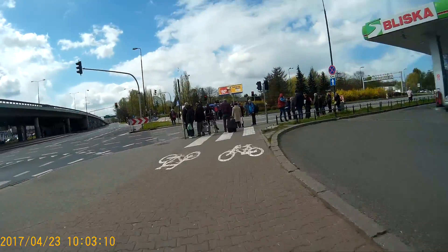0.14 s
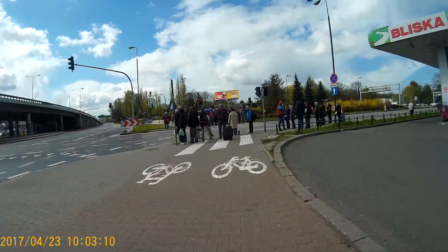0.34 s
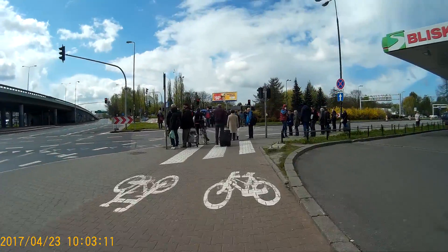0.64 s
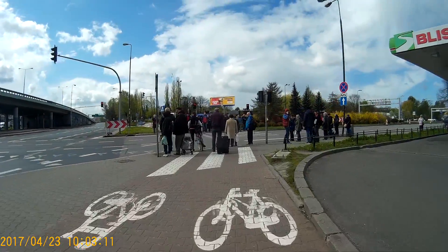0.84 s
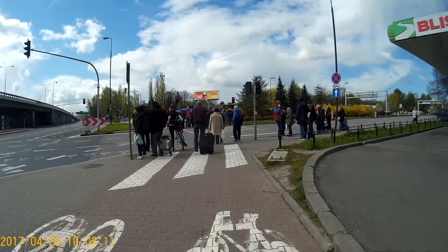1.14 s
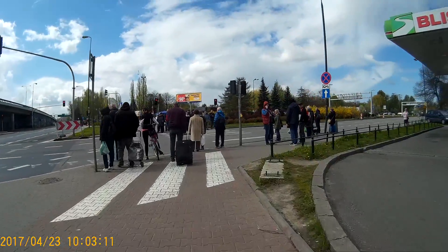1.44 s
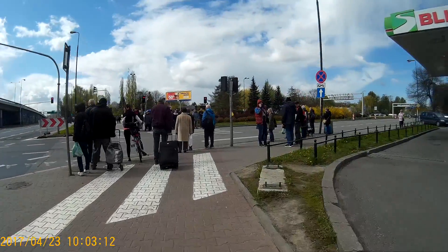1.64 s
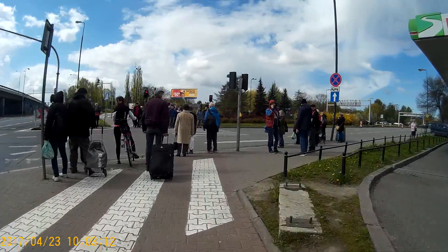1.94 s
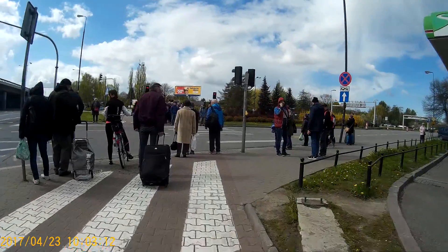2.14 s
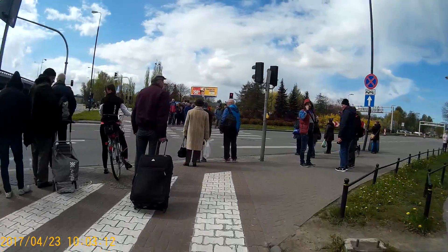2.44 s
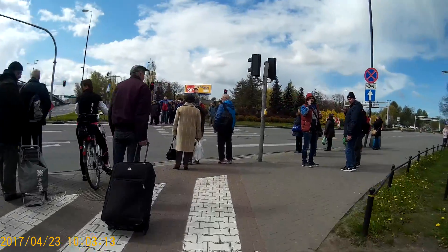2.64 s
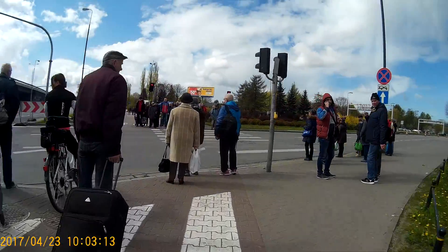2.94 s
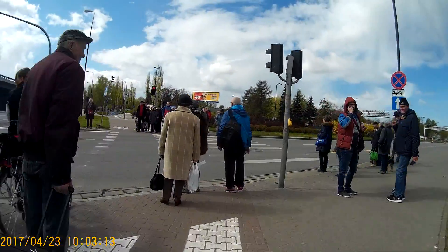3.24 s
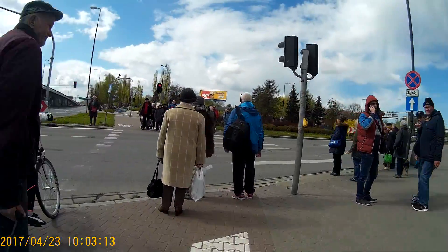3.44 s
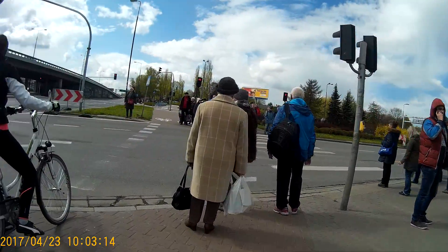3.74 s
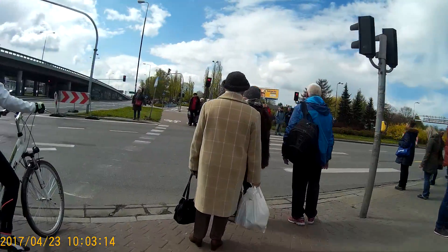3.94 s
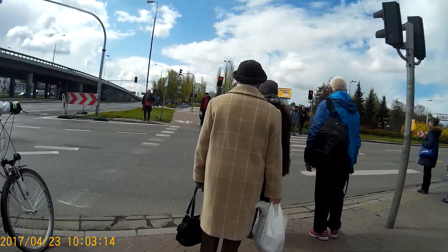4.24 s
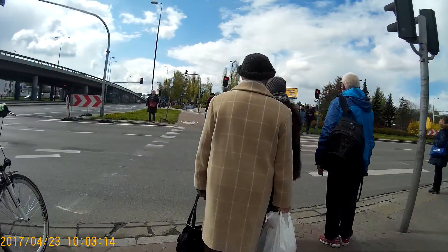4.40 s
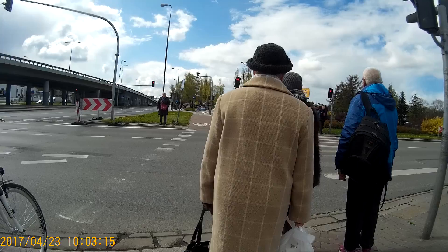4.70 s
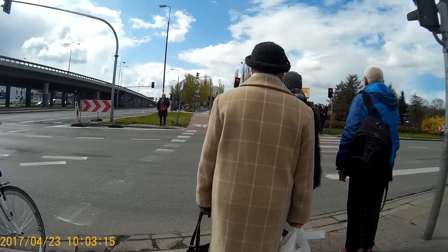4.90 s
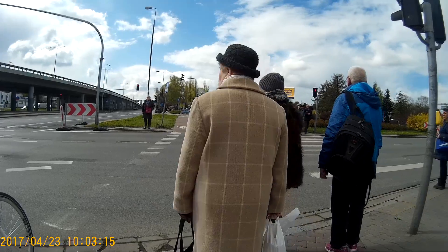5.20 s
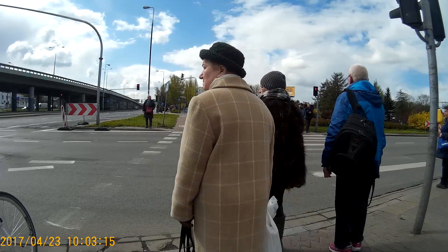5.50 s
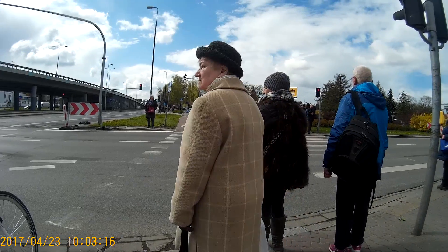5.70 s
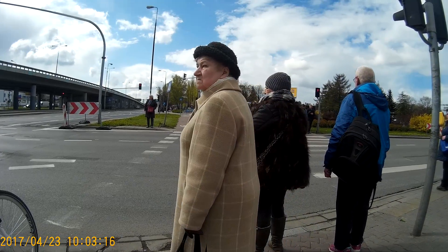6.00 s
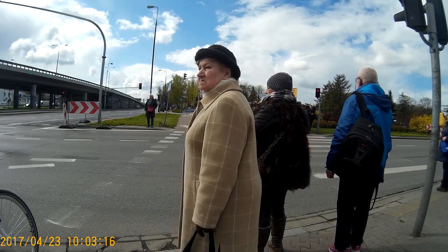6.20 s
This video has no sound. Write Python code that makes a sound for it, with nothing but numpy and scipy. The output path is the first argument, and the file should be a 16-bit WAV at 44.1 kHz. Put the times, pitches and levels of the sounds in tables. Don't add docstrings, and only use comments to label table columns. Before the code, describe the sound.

Close on a bicycle handlebar, the wheels rumble over paving blocks while a loose plastic housing clacks hard and thuds on its pad. Grit ticks and air buffets the microphone. The rattling thins as the bike slows, then a low shudder and a sharp bar knock mark the stop. A few dull taps follow, then only distant traffic wash and faint hiss at an open street crossing.

```python
import sys
import numpy as np
from scipy import signal
from scipy.fft import rfft, irfft
from scipy.io import wavfile
from scipy.ndimage import uniform_filter1d

SR = 44100
rng = np.random.default_rng(int(sys.argv[2]) if len(sys.argv) > 2 else 0)


def field_ratio(decibels):
    return 10 ** (np.asarray(decibels, dtype=float) / 20)


def transcribe(u):
    v = np.clip(np.atleast_2d(u).T, -1, 1)
    q = np.round(v * 32767).astype(np.int16)
    wavfile.write(sys.argv[1], SR, q)


N = 280211

# (start [s], end [s], extra level [dB])
BUSY_TIMES = [
    (-.1, 2.45, 5),
    (2.4, 3.6, 3),
    (3.2, 4.2, 0),
    (4.7, 4.96, 6.5),
]
# (frequency [Hz], width [Hz], level [dB])
CIRCUIT_WHINE = (7940, 6, -85)
# (frequency [Hz], level per Hz [dB])
TRAFFIC_COLOUR = [(12, -47), (20, 8.5), (168, -2), (403, -6.5), (485, -6.5), (718, -12), (1020, -12.5),
                  (1110, -16), (1610, -14), (5000, -30.5), (6500, -55), (11000, -120)]
# (time [s], level [dB])
ROAD_SHAKE = [(0, -25.5), (.6, -28), (1.2, -30), (1.6, -31), (2.2, -33), (2.55, -36), (2.9, -31),
              (3.3, -38.5), (3.7, -39.5), (4.0, -45.5), (4.3, -42.5), (4.6, -52), (4.67, -31), (4.78, -37),
              (4.92, -46), (5.25, -61), (5.8, -80.5)]
# (time [s], level [dB], length [s])
FORK_JOLTS = [(0.202, -14.5, 0.055), (0.4, -20.5, 0.04), (0.597, -22.5, 0.04), (0.684, -17, 0.064),
              (0.94, -19, 0.085), (1.002, -18, 0.02), (1.08, -16, 0.033), (1.487, -21, 0.1),
              (1.576, -19.9, 0.016), (1.646, -16.4, 0.021), (1.785, -24.5, 0.078), (2.001, -21, 0.03),
              (2.096, -23, 0.038), (2.3, -25.5, 0.12), (2.369, -32, 0.028), (2.44, -37, 0.048),
              (2.658, -23, 0.065), (2.74, -20, 0.019), (2.904, -23, 0.13), (3.137, -27, 0.14),
              (3.447, -26, 0.032), (3.519, -19.5, 0.048), (3.904, -32.5, 0.22), (4.246, -33.5, 0.17),
              (4.552, -39, 0.054), (4.988, -37, 0.041), (5.099, -39.5, 0.058), (5.363, -51, 0.06),
              (5.515, -44.5, 0.074), (5.683, -52, 0.065)]
# (frequency [Hz], width [Hz], level [dB])
FORK_PEAKS = [(64.15, 19, 6.5), (93.9, 31, -5.5)]
# (frequency [Hz], width [Hz], level [dB])
FRAME_PEAKS = [(185.7, 42, -1.5), (258, 94, -10.5), (150.1, 54, -1), (336.4, 40, -18.5), (120, 21, -5.5)]
# (frequency [Hz], width [Hz], level [dB])
HOUSING_PEAKS = [(799.4, 23, 12), (405, 230, 3.5), (917, 300, 2.5), (1460, 310, -12), (1696, 440, -1),
                 (1260, 360, -9.5), (678, 37, -5), (2530, 3800, -20.5)]
# (time [s], bar ring level [dB], low thump level [dB], tuning [factor], damping [factor])
FRAME_KNOCKS = [
    (4.738, -17.5, -23, .99, 0.65),
    (4.741, -60, -20, 0.51, 1.1),
    (4.952, -33.5, -52, 1.02, 1),
    (4.957, -33.5, -24, 1.16, 0.6),
    (5.091, -46, -41.5, 1.14, 2.7),
    (5.479, -57, -39, .6, 2.4),
    (5.51, -50, -34, .42, 1.5),
    (4.183, -40, -33, 0.69, 1.6),
]
# (frequency [Hz], level [dB], time to fall 60 dB [s])
BAR_TONES = [(800, -7, .07), (888, -3, .06), (1150, -6, .025), (1380, -3, .025), (1740, -5, .03),
             (1900, -9, .04), (2740, -20, .02), (1500, -3, .005), (470, -10, .02)]
# (frequency [Hz], level [dB], time to fall 60 dB [s])
THUMP_TONES = [(184, 15.5, 0.083), (266, 13, 0.066), (332, 2.5, 0.033), (430, -16, 0.039)]
# (time [s], frequency [Hz], level [dB], time to fall 60 dB [s])
THIN_PING = (4.951, 3780, -57, .03)
# (frequency [Hz], level [dB], time to fall 60 dB [s])
CLACK_TONES = [(-670, -21, .04), (-795, -15, .085), (-1170, -20, .022), (-1410, -11, .019),
               (-1480, -3, .011), (1940, -7.5, .003), (2250, -5, .012), (-2680, -9, .0045)]
# (frequency [Hz], level [dB], time to fall 60 dB [s])
RIM_TONES = [(-3280, 2.5, 0.004), (3603, -12, 0.025), (4652.5, -2.5, 0.011), (4912.5, 10, 0.0049),
             (5709.5, -12.5, 0.018), (-6020, -18, 0.004), (-6960, -17.5, 0.00067), (-8700, -4.5, .005),
             (9504, -16, 0.0081), (11797, -30.5, 0.0024), (-14500, -40, .002)]
# (frequency [Hz], level [dB], time to fall 60 dB [s])
BUMP_TONES = [(803, -9.5, 0.051), (-1250, 9.5, 0.0025), (1749.5, -2, 0.012), (3304.5, -37.5, .004),
              (501, 3, 0.0052), (-2700, -17, 0.0038)]
# (time [s], blow level [dB])
SQUARE_HITS = [(.0013, -3.5), (.0306, -1.5), (.1079, -1), (.1444, -1.5), (0.2865, -5.5), (.3014, -10.5),
               (0.3172, -8), (0.4783, -4.5), (.5685, -8), (.599, -4.5), (0.6368, -3), (.6852, -3.3),
               (0.6964, -2.5), (.8499, -7.5), (.907, -2), (.9543, -0.8), (1.0931, -11.5), (1.4597, -8),
               (1.4907, -5), (1.5369, -8), (1.58, -10), (1.7802, -5), (1.8634, -8.5), (2.743, -7.5),
               (2.839, -5.5), (2.9262, -4.5), (3.054, -4), (3.1603, -6), (3.591, -10.5)]
# (time [s], blow level [dB])
LIGHT_HITS = [(.0342, -10.5), (.359, -28), (.388, -30), (.7368, -14), (.7818, -15), (.9665, -12.5),
              (1.011, -20), (1.1467, -15.5), (1.287, -20.5), (1.3161, -12), (1.4005, -22.5), (1.5182, -25),
              (1.6649, -12.5), (1.9678, -24.5), (2.0313, -15), (2.1, -13.5), (2.1845, -15.5), (2.2588, -23),
              (2.3312, -17.5), (2.5466, -15), (2.636, -25), (2.6997, -22), (2.95, -14), (3.0355, -30),
              (3.0812, -31), (3.2337, -16), (3.5118, -33), (4.6642, -19.5), (4.6761, -29.5),
              (4.7352, -26.5)]
# (time [s], blow level [dB])
SLANTING_HITS = [(.2072, -13), (.401, -19), (.4202, -23.5), (0.434, -16), (0.4607, -17.5), (0.5442, -22.5),
                 (.9238, -11.5), (.9427, -12), (1.6446, -17), (1.6523, -12), (1.7271, -26), (1.7595, -27.5),
                 (1.9219, -14.5), (1.935, -15.5), (2.005, -17.5), (2.134, -16.5), (2.309, -34),
                 (2.3648, -34.5), (2.9818, -22.5), (3.0216, -28), (3.114, -31.5), (3.2656, -34.5),
                 (3.4538, -40.5), (3.526, -37.5), (3.547, -35), (4.6473, -35), (4.6934, -26.5),
                 (4.722, -27), (4.79, -41), (4.821, -39.5)]
# (time [s], blow level [dB])
PAD_LANDINGS = [(.024, -19.5), (.0763, -11.5), (.0866, -20.5), (.138, -20.5), (.1519, -24.5), (.183, -28.5),
                (.1978, -14), (.2129, -10), (.2228, -15.5), (.2353, -20.5), (.2548, -22.5), (.2615, -23.5),
                (.4123, -13.5), (.6247, -14), (.6668, -12.5), (.675, -17.5), (.7122, -15.5), (.8116, -21),
                (.9314, -15), (1.0737, -17.5), (1.084, -22.5), (1.4355, -30), (1.504, -22), (1.5733, -19),
                (2.6786, -27.5), (2.7339, -17.5), (2.9174, -19), (3.1414, -17), (3.5806, -24.5),
                (4.6274, -45)]
SOFTNESS = (.05, .09, .42, .83)

TOP_HZ = 15740
SHUDDER_START_S, SHUDDER_END_S = 4.625, 4.94


def evened(x):
    return x / np.sqrt(np.mean(x ** 2) + 1e-20)


def road_shake_db():
    s, db = np.transpose(ROAD_SHAKE)
    return np.interp(np.arange(N) / SR, s, db)


def add(mix, s, sound):
    part = mix[max(round(s * SR), 0):][:len(sound)]
    part += sound[:len(part)]


def span(start, end, edge_s):
    t = np.arange(N) / SR
    return np.clip((t - start) / edge_s, 0, 1) * np.clip((end - t) / edge_s, 0, 1)


def lumps(depth_db):
    slow = uniform_filter1d(uniform_filter1d(rng.standard_normal(N), size=1800), size=1800)
    return field_ratio(depth_db * evened(slow))


def coloured_noise(gain_at_hz):
    return evened(irfft(rfft(rng.standard_normal(N)) * gain_at_hz, N))


def shaken(drive, peaks):
    out, t = 0, np.arange(len(drive)) / SR
    for k, (hz, width, db) in enumerate(peaks):
        turn = np.exp(2j * np.pi * hz * t)
        r = np.exp(-np.pi * width / SR)
        slow = drive / turn
        for _ in range(2):
            slow = signal.lfilter([1 - r], [1, -r], slow)
        out = out + (-1) ** k * field_ratio(db) * (turn * slow).real
    return evened(out)


def ring(tones, tuning=1., damping=1., size=6000, lean_db=0.):
    t = np.arange(size) / SR
    hz, db, t60 = np.transpose(tones)[:, :, None]
    tuning, lean_db = np.reshape(tuning, (-1, 1)), np.reshape(lean_db, (-1, 1))
    fade = field_ratio(db + lean_db - 60 * t * damping / t60)
    out = (fade * np.sin(2 * np.pi * hz * tuning * t)).sum(0)
    return out / abs(out).max()


def hiss():
    hz = np.fft.rfftfreq(N, 1 / SR)
    colour = (hz < TOP_HZ) / np.sqrt(1 + (hz / 15200) ** 30)
    extra_db = sum(db * span(a, b, 0.056) for a, b, db in BUSY_TIMES)
    return field_ratio(-69.5 + extra_db) * coloured_noise(colour)


def whine():
    hz, width, db = CIRCUIT_WHINE
    fade = np.clip(3.8 - np.arange(N) / SR, 0, 1)
    return field_ratio(db) * shaken(rng.standard_normal(N), [(hz, width, db)]) * fade


def street():
    hz = np.fft.rfftfreq(N, 1 / SR)
    f, db = np.transpose(TRAFFIC_COLOUR)
    colour = field_ratio(np.interp(np.log(hz + 1), np.log(f + 1), db)) * (hz < TOP_HZ)
    return field_ratio(-59) * coloured_noise(colour)


def road():
    sway_db, buffet_db, braked_db, jolt_hum_db = 5.5, -1, -23, -18
    steadiness = 0.46
    roll = field_ratio(road_shake_db())
    free = field_ratio(braked_db * span(SHUDDER_START_S - .02, SHUDDER_END_S, 0.036))
    t = np.arange(0, N, 50) / SR
    jolt = sum(field_ratio(db) ** 2 * np.exp(-((t - s) / (0.39 * length)) ** 2) for s, db, length in FORK_JOLTS)
    jolt = np.interp(np.arange(N) / SR, t, jolt)
    fork_drive, frame_drive, air = rng.standard_normal((3, N))

    fork = shaken(fork_drive, FORK_PEAKS)
    fork = evened(fork / (uniform_filter1d(fork ** 2, size=1300) + .05) ** (steadiness / 2))
    sway = np.sqrt((roll * free * field_ratio(sway_db)) ** 2 + jolt)
    hum = np.sqrt(roll ** 2 + jolt * field_ratio(jolt_hum_db) ** 2)
    frame = lumps(2.5) * shaken(frame_drive, FRAME_PEAKS)
    low_band = signal.butter(2, [14, 40], "band", fs=SR, output="sos")
    buffet = evened(signal.sosfilt(low_band, air))
    return sway * fork + hum * frame + roll * free * field_ratio(buffet_db) * buffet


def grit():
    size = field_ratio(2.5 * np.minimum(rng.exponential(1, N), 4)) * rng.choice([-1, 1], N)
    ticks = size * (rng.random(N) < 4000 / SR)
    fade = np.clip((5.4 - np.arange(N) / SR) / 0.15, 0, 1)
    level = field_ratio(-24.5 + 0.78 * road_shake_db())
    return level * fade * lumps(3.0) * shaken(ticks, HOUSING_PEAKS)


def fork_shudder():
    start_db, hold_s, hold_db_per_s, decay_db_per_s = -18.5, 0.1, 35, 60
    age = np.maximum(np.arange(N) / SR - SHUDDER_START_S, 0)
    db = start_db - hold_db_per_s * np.minimum(age, hold_s) - decay_db_per_s * np.maximum(age - hold_s, 0)
    note = np.sin(2 * np.pi * 68.9 * (age - .002))
    return np.sqrt(2) * field_ratio(db) * span(SHUDDER_START_S, SHUDDER_END_S, 0.0222) * note


def knocks():
    rasp_db, rasp_s, scrape_s = -18.5, 0.033, 0.014
    out, t = np.zeros(N), np.arange(N) / SR
    rasp = shaken(np.convolve(rng.standard_normal(SR), np.hanning(30)), HOUSING_PEAKS[:-1])
    s, hz, db, t60 = THIN_PING
    add(out, s, field_ratio(db) * np.minimum(t[:6000] / .003, 1) * ring([(hz, db, t60)]))
    all_luck = rng.standard_normal((len(FRAME_KNOCKS), 2000))
    for (s, bar_db, low_db, tuning, damping), luck in zip(FRAME_KNOCKS, all_luck):
        scrape = np.convolve(luck ** 3 * np.exp(-t[:2000] / scrape_s * 2), np.hanning(22))
        piece = rasp[int(abs(luck[0]) * 9000):][:8000]
        add(out, s, field_ratio(bar_db + rasp_db) * (np.exp(-t[:8000] / rasp_s)[:len(piece)] * piece))
        for tones, level_db in (BAR_TONES, bar_db), (THUMP_TONES, low_db):
            knock = signal.fftconvolve(scrape, ring(tones, tuning, damping))
            add(out, s, field_ratio(level_db) * knock / abs(knock).max())
    return out


def contacts():
    tables = SQUARE_HITS, LIGHT_HITS, SLANTING_HITS, PAD_LANDINGS
    rows = [(s, db, soft) for table, soft in zip(tables, SOFTNESS) for s, db in table]
    square = list(SQUARE_HITS) + list(LIGHT_HITS)
    for (s, db), (a, b) in zip(square, rng.random((len(square), 2))):
        rows.append((s + 0.016 + 0.0017 * (a - .5), db - 30 - 8 * b, 0.35))
    shake_s, shake_db = np.transpose(ROAD_SHAKE)
    for k, (a, b, soft) in enumerate(rng.random((30, 3))):
        s = (k + a) / 9.9
        rows.append((s, np.interp(s, shake_s, shake_db) - 1 - 9 * b, soft))
    return rows


def clack_rim(db, luck):
    level = field_ratio(4 * luck[1] - 2 + .08 * db)
    return level * ring(RIM_TONES, .98 + .04 * luck[2], size=1000, lean_db=8 * luck[20:31] - 4)


def clack_body(luck):
    return ring(CLACK_TONES, 1 + .035 * (luck[4:12] - .5), size=4000, lean_db=5 * (luck[12:20] - .5))


def padded_bump(t, luck):
    chatter_db, crackle_db = -6, -17
    sparse = (luck[3:] < .009) * np.cos(2 * np.pi * luck[3:] / .009)
    chatter = field_ratio(chatter_db - 60 * np.where(t < 0, -t / .022, t / .06)) * sparse
    chatter[300] = 1
    tuning = .93 + .08 * luck[0] + .06 * luck[4:10]
    soft_ring = np.convolve(ring(BUMP_TONES, tuning, size=3000), np.hanning(14) / 6.5)
    bump = signal.fftconvolve(chatter, soft_ring)
    grain = np.diff(luck[3:400], 2) * field_ratio(-60 * t[300:695] / .006)
    crackle = signal.fftconvolve(chatter, np.convolve(grain, np.hanning(12)))
    add(bump, 0, field_ratio(crackle_db) * crackle)
    return bump


def rattle():
    rim_lead_s, rim_db, swing_db, swing_s = 0.00033, -13, -14, 0.014
    pad = 2000
    out, t = np.zeros(N + pad), np.arange(-300, 1200) / SR
    lobe = np.linspace(-1.5, 1.5, round(1.506 * swing_s * SR))
    swing = np.cos(np.pi * lobe) * np.cos(np.pi * lobe / 3) ** 2
    touches = contacts()
    for (s, db, soft), luck in zip(touches, rng.random((len(touches), 1503))):
        soft, s = np.clip(soft, 0, 1), s + pad / SR
        add(out, s - rim_lead_s, field_ratio(db + 2.5 + rim_db) * (1 - soft) * clack_rim(db, luck))
        add(out, s - rim_lead_s + 7 / SR, field_ratio(db + 1.0) * (1 - soft) * clack_body(luck))
        add(out, s + t[0] - .0006, field_ratio(db + 9.0) * soft * padded_bump(t, luck))
        add(out, s - 0.78 * swing_s, field_ratio(swing_db + 0.52 * db) * (2 * soft - 1) * swing)
    return out[pad:]


def scene():
    return (street() + road() + grit() + fork_shudder() + knocks() + rattle())[None]


def band_limit(x):
    return signal.sosfilt(signal.butter(12, 16490, fs=SR, output="sos"), x)


def record(dry):
    dulled = signal.sosfilt(signal.butter(4, 11500, fs=SR, output="sos"), dry)
    mix = np.clip(dulled, -.7, .7) + hiss() + whine()
    return band_limit(mix)


dry = scene()
out = record(dry)
transcribe(out)
```